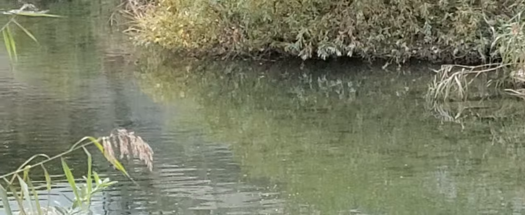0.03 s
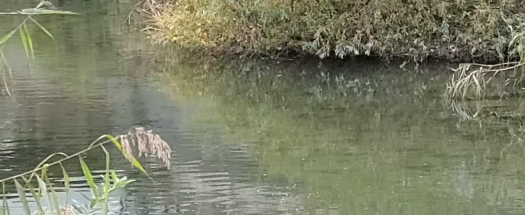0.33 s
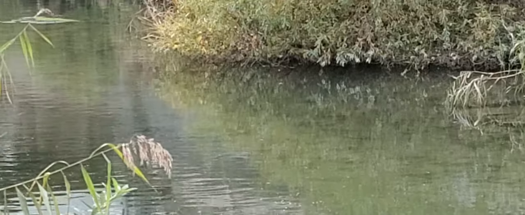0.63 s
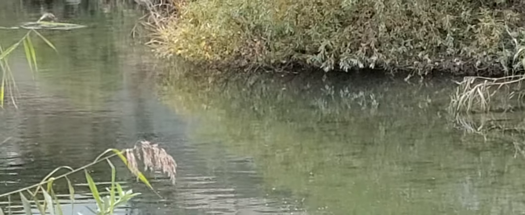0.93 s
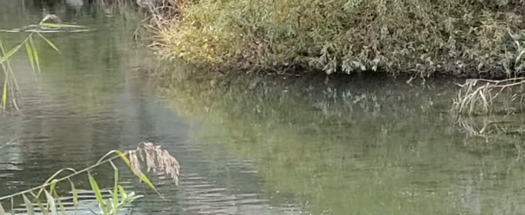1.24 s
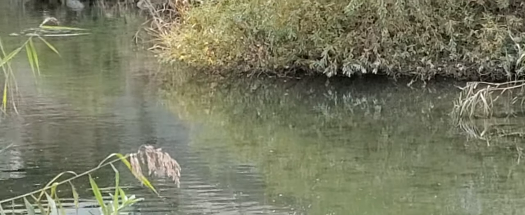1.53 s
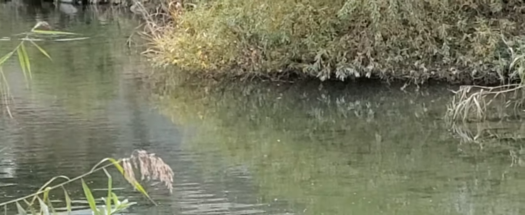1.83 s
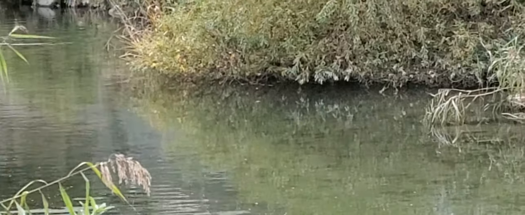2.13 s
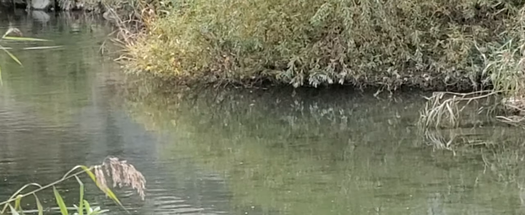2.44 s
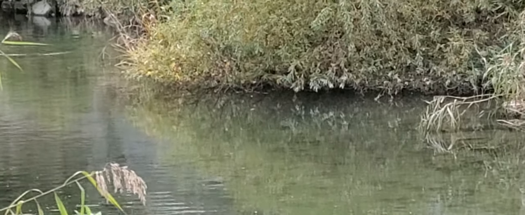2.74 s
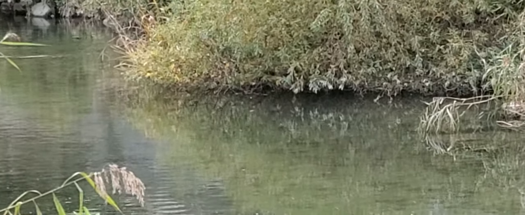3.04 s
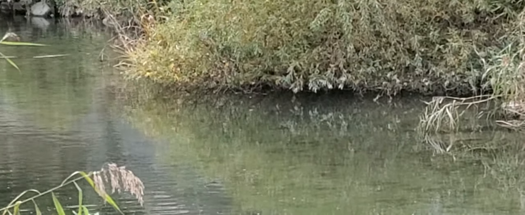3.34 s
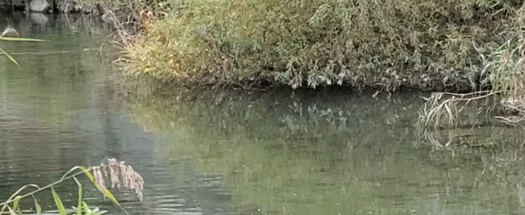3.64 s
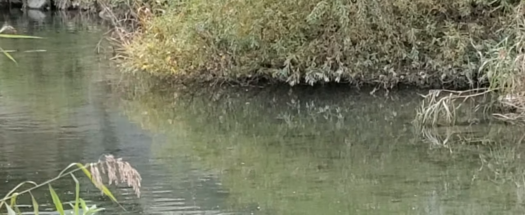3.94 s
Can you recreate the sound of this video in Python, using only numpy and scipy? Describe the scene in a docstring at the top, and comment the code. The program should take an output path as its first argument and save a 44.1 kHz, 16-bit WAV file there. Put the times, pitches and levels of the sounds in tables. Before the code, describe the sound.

Distant traffic makes a steady roar and deep boom over a quiet pond, growing louder after about a second. Small birds chirp faintly across the water, while dry reeds tick very softly to the right of the microphone.

```python
"""The roar and deep boom of distant traffic hang over a quiet pond. The roar is steady tyre noise
that comes up about 6 dB after a second as the recorder's gain rises; the boom is far engines.
Small birds whistle gliding chirps in the bushes across the water, over a fine hiss of leaves.
Dry reeds tick and rustle nearer by, to the right; birds and reeds echo off the banks.
Two microphones a little apart hear the bass alike and the treble unrelated."""
import sys
import numpy as np
from scipy import signal
from scipy.fft import rfft, irfft
from scipy.io import wavfile
from scipy.ndimage import uniform_filter1d

SR = 44100
rng = np.random.default_rng(int(sys.argv[2]) if len(sys.argv) > 2 else 0)


def file_out(sig):
    """Save sig as 16-bit WAV at sys.argv[1]."""
    # one column per channel
    cols = np.atleast_2d(sig).T
    # limit, then scale
    lim = np.clip(cols, -1, 1)
    pcm = np.round(lim * 32767).astype(np.int16)
    wavfile.write(sys.argv[1], SR, pcm)


N = 176400
TIME = np.arange(N) / SR


def amp(db):
    """Decibels to gain."""
    return 10 ** (np.asarray(db) / 20)


def unit(x):
    """Scales to rms 1."""
    return x / np.sqrt(np.mean(abs(x) ** 2) + 1e-30)


def at_hz(points, hz):
    """Reads a curve over log frequency."""
    f, value = np.transpose(points)
    return np.interp(np.log(hz + 1), np.log(f + 1), value)


def fader(points):
    """Gain over time from a curve in dB."""
    return amp(np.interp(TIME, *np.transpose(points)))


def pan(db):
    """Stereo gains for left minus right in dB: negative sits to the right."""
    return unit(amp(np.array([[db / 2], [-db / 2]])))


def add(mix, start_s, sound):
    """Drops a sound into the mix."""
    part = mix[:, max(round(start_s * SR), 0):][:, :sound.shape[-1]]
    part += sound[..., :part.shape[1]]


def band(x, hz, width_hz):
    """Bell-shaped band filter; the width is one standard deviation."""
    f = np.fft.rfftfreq(len(x), 1 / SR)
    return irfft(rfft(x) * np.exp(-.5 * ((f - hz) / width_hz) ** 2), len(x))


def drift(rate_hz):
    """Slow random wander of rms 1."""
    return unit(band(rng.standard_normal(N), 0, rate_hz))


def tone(hz):
    """A sine that follows a pitch curve."""
    return np.sin(2 * np.pi * np.cumsum(hz) / SR)


def bank_echo(dry, wet_db, t60_s=0.26, build_s=0.0064):
    """Adds the scattered echo of bushes and banks."""
    t = np.arange(SR // 2) / SR
    tail = rng.standard_normal((2, len(t))) * 10 ** (-3 * t / t60_s)
    tail *= np.minimum(t / build_s, 1)
    tail /= np.linalg.norm(tail, axis=1, keepdims=True)
    return dry + amp(wet_db) * signal.fftconvolve(dry, tail, axes=1)[:, :N]


# Left-right likeness of the beds, in phase: f/Hz, correlation
IN_PHASE = [(60, 0.72), (87, 1), (130, 0.86), (180, 0.91), (260, 0.95), (380, 0.52), (550, 0.48),
            (790, -0.085), (1140, -0.2), (1650, -0.4), (2380, -0.12), (3440, -0.11), (4970, 0.055),
            (7180, -0.052), (10400, -0.065), (15000, 0.02)]
# Their likeness a quarter cycle apart: f/Hz, correlation
QUADRATURE = [(50, -0.25), (130, -0.26), (600, -0.11), (1050, 0.61), (1900, 0.036), (2700, -0.0011),
              (3600, -0.37), (6000, -0.12)]
# Their stereo balance: f/Hz, left minus right/dB
BED_BALANCE = [(60, -2.5), (99, 1), (160, -3.5), (270, -2), (450, -1.5), (740, -3), (1220, -4.5),
               (2010, -1), (3330, -2.5), (5500, 0), (9080, -1), (15000, -9.5)]


def noise_bed(spectrum, patchy_db, flutter_db):
    """Noise from all around at two microphones, with drifting patches from the moving air."""
    hz, frames = np.fft.rfftfreq(2048, 1 / SR), N // 512 + 5
    left_re, left_im, other_re, other_im, patches = rng.standard_normal((5, frames, len(hz)))
    patches = uniform_filter1d(patches, size=9, axis=0)  # smooth in time
    patches = unit(uniform_filter1d(patches, size=14, axis=1))  # and in frequency
    likeness = at_hz(IN_PHASE, hz) - 1j * at_hz(QUADRATURE, hz)
    likeness /= np.maximum(abs(likeness) / .995, 1)
    left = left_re + 1j * left_im
    right = likeness * left + np.sqrt(1 - abs(likeness) ** 2) * (other_re + 1j * other_im)
    lean_db = at_hz(BED_BALANCE, hz) / 2
    colour = amp(at_hz(spectrum, hz) + patchy_db * patches)
    spectra = np.array([left * amp(lean_db), right * amp(-lean_db)]) * colour
    _, bed = signal.istft(spectra, nperseg=2048, noverlap=1536, time_axis=1, freq_axis=2)
    return unit(bed[:, :N]) * amp(flutter_db * drift(rate_hz=14))


# Colour of the far birdsong: f/Hz, relative level/dB
HAZE_SPECTRUM = [(2500, -32), (3300, -5), (4200, -2), (5200, 4), (5700, -17), (7000, -31)]


def song_haze():
    """Far birdsong, merged by echo into a faint wash."""
    return amp(-76) * noise_bed(HAZE_SPECTRUM, patchy_db=3.5, flutter_db=0.5)


# Colour of the leaf hiss: f/Hz, relative level/dB
LEAF_SPECTRUM = [(3000, -44), (5500, 0), (7000, 0.5), (8700, -3), (10500, -15), (15000, -25)]
# Its rise and fall: t/s, level/dB
LEAF_FADER = [(0.1, -73.5), (0.5, -81.5), (1.0, -76), (1.25, -75), (1.8, -76), (2.2, -77), (2.7, -79),
              (3.05, -87), (3.4, -77), (3.8, -91)]


def leaves():
    """Fine hiss of foliage."""
    return noise_bed(LEAF_SPECTRUM, patchy_db=1.5, flutter_db=.5) * fader(LEAF_FADER)


def whistle(length_s, first_hz, middle_hz, last_hz, waver=0.0318, rough=0.39):
    """One gliding bird note that swells and fades, unsteady in pitch and loudness."""
    progress = np.linspace(0, 1, int(length_s * SR))
    knots = np.linspace(0, 1, 24)
    bend, flicker = (np.interp(progress, knots, row) for row in rng.standard_normal((2, 24)))
    glide = np.polyfit([0, .5, 1], [first_hz, middle_hz, last_hz], 2)
    hz = np.polyval(glide, progress) * (1 + waver * bend)
    envelope = np.interp(progress, [0, 0.31, 1], [0, 1, 0])
    return envelope * unit((1 + rough * flicker) * tone(hz))


def far_flock(calls=36, low_hz=3220, high_hz=5440, fall=0.096):
    """Faint twitter of birds farther off: falling notes at random, mostly echo."""
    twitter = np.zeros((2, N))
    for slot, (when, pitch, loud) in enumerate(rng.random((calls, 3))):
        hz = low_hz + pitch * (high_hz - low_hz)
        note = whistle(.04, hz * (1 + fall), hz, hz * (1 - fall))
        add(twitter, (slot + when) / calls * N / SR, amp(-82.25 + 5 * loud) * note)
    return bank_echo(twitter, wet_db=2)


# Ticks of dry reeds: t/s, level/dB, centre f/Hz, left minus right/dB
REED_TICKS = [(0.1456, -67, 8800, -1), (0.2894, -71, 9500, -7), (0.8659, -72, 10000, -8),
              (1.0969, -66, 10300, -16), (1.2047, -62, 9550, -16), (1.3558, -67, 10200, -18),
              (1.4994, -70, 9800, -10), (2.5244, -73, 10200, -5), (2.708, -71, 9000, -5),
              (3.3368, -73, 11800, -9), (3.3657, -74, 11000, -9)]
# Rustles of reed leaves: t/s, length/s, level/dB
REED_RUSTLES = [(2.56, .09, -83), (3.155, 0.071, -78), (3.385, .04, -80)]


def reeds(tick_peak_s=0.00085, grains_per_s=900):
    """Single dry snaps, and clumps of tiny ones where leaves brush."""
    mix, t = np.zeros((2, N)), np.arange(1024) / SR
    snap_envelope = t / tick_peak_s * np.exp(1 - t / tick_peak_s)
    for start_s, db, hz, pan_db in REED_TICKS:
        snap = unit(band(rng.standard_normal(len(t)), hz, width_hz=1800))
        add(mix, start_s, pan(pan_db) * amp(db) * snap * snap_envelope)
    for start_s, length_s, db in REED_RUSTLES:
        samples = int(length_s * SR)
        grains = rng.standard_normal(SR) * (rng.random(SR) < grains_per_s / SR)
        rustle = unit(band(grains[:samples], hz=12200, width_hz=2400))
        add(mix, start_s, pan(-15) * amp(db) * np.sqrt(np.hanning(samples)) * rustle)
    return bank_echo(mix, wet_db=-3)


# Chirps across the water: t/s, length/s, first f/Hz, middle f/Hz, last f/Hz, level/dB
BIRD_CHIRPS = [(0.205, .05, 5700, 5200, 4200, -73), (0.408, .04, 4600, 4600, 4400, -72),
               (0.924, .04, 5500, 4100, 3400, -70), (1.145, .052, 5700, 3850, 3120, -58.5),
               (1.698, 0.043, 4200, 3400, 3050, -64), (1.776, 0.036, 3500, 3380, 3080, -64),
               (1.858, 0.053, 4600, 4390, 4300, -67), (2.339, 0.052, 4400, 4000, 3200, -60),
               (2.37, .04, 5300, 4300, 3180, -69), (2.409, 0.042, 4200, 3770, 3260, -60),
               (2.547, 0.029, 4300, 4200, 4000, -69), (2.64, .065, 4300, 5750, 5730, -71),
               (2.695, 0.034, 5820, 5000, 3840, -63), (2.735, .03, 6000, 5230, 4300, -75),
               (3.184, .07, 5900, 6450, 6000, -72), (3.225, 0.022, 3400, 3350, 3200, -64),
               (3.255, .025, 3980, 4200, 4300, -65), (3.434, .07, 5700, 5520, 5300, -72),
               (3.508, 0.048, 5500, 5240, 4750, -69), (3.60, .05, 5700, 5950, 5600, -75),
               (3.676, 0.033, 4600, 4410, 4440, -62.5), (3.685, 0.039, 3900, 3630, 3670, -58),
               (3.835, .03, 4700, 4100, 3470, -64), (3.893, 0.0263, 4300, 4200, 4100, -58),
               (3.917, 0.028, 3760, 3600, 3500, -58.5), (3.89, .06, 5200, 5370, 5500, -74),
               (3.971, 0.05, 4200, 4500, 4380, -58.5)]
# Thin high pips: t/s, level/dB
BIRD_PIPS = [(1.357, -71), (2.114, -76), (2.58, -76), (3.146, -64), (3.893, -70)]


def birds(pip_s=0.015, pip_hz=11100):
    """Distant chirps blurred by the banks, and nearer thin pips far to the right."""
    far, near = np.zeros((2, 2, N))
    for start_s, length_s, *glide_hz, db in BIRD_CHIRPS:
        add(far, start_s, pan(-9.5) * amp(db) * whistle(length_s, *glide_hz))
    for start_s, db in BIRD_PIPS:
        add(near, start_s, pan(-23) * amp(db) * whistle(pip_s, pip_hz, pip_hz, pip_hz, waver=.02))
    return bank_echo(far, wet_db=-1) + bank_echo(near, wet_db=-4)


# Brief midrange swells in the roar: peak t/s, half-length/s, centre f/Hz, width/Hz, level/dB
MID_SWELLS = [(2.132, 0.035, 373, 130, -45), (2.87, .05, 398, 110, -49), (2.92, .1, 780, 60, -51)]


def mid_swells(spectrum):
    """Narrow bands of the roar briefly grow fuller."""
    bed, mix = noise_bed(spectrum, patchy_db=2, flutter_db=.4), np.zeros((2, N))
    for peak_s, half_s, hz, width_hz, db in MID_SWELLS:
        envelope = np.exp(-((TIME - peak_s) / half_s) ** 2)
        mix += amp(db) * envelope * unit(np.array([band(side, hz, width_hz) for side in bed]))
    return mix


# Resonances of the boom: f/Hz, full width/Hz, relative level/dB
BOOM_RESONANCES = [(56.5, 23.4, -2.5), (77.2, 18.4, -7.5)]
# Heave of the boom and drone: t/s, level/dB
BOOM_FADER = [(0.1, -42), (0.27, -49), (0.38, -40), (0.51, -51), (0.61, -38.5), (0.73, -46.5), (0.9, -42),
              (1.15, -42.5), (1.3, -36), (1.52, -40), (1.68, -34.5), (1.97, -37.5), (2.28, -34.5),
              (2.7, -35), (3.0, -38.5), (3.14, -31), (3.35, -37), (3.7, -40), (4, -33.5)]


def engines(drone_hz=58.36, surge_hz=79.5, surge_at_s=1.806, surge_half_s=0.13):
    """The boom and wavering drone of far engines, with one brief higher surge."""
    boom = sum(amp(db) * unit(band(rng.standard_normal(N), hz, full_width / 2))
               for hz, full_width, db in BOOM_RESONANCES)
    waver_hz = 1.516 * drift(rate_hz=2.65)
    drone = amp(-5.5) * unit(tone(drone_hz + waver_hz))
    surge_envelope = np.exp(-((TIME - surge_at_s) / surge_half_s) ** 2)
    surge = amp(-34.5) * unit(tone(surge_hz + waver_hz)) * surge_envelope
    return pan(-2.5) * ((boom + drone) * fader(BOOM_FADER) + surge)


# Colour of the tyre roar: f/Hz, relative level/dB
ROAR_SPECTRUM = [(12, -31), (21, -1), (29, -2), (45, -2.5), (100, 6), (140, -5.5), (190, -3), (232, -1.5),
                 (310, -6.5), (480, -9), (760, -9.5), (1100, -13.5), (1400, -18.5), (1750, -19),
                 (2350, -28), (3000, -28.5), (4000, -35), (5200, -41), (5900, -46), (8500, -50.5),
                 (10200, -55), (11300, -55.5), (12000, -57.5), (15500, -58)]
# The recorder's gain ramp, applied to the roar: t/s, gain/dB
RECORDER_GAIN = [(0.1, -5), (0.7, -5.5), (1.05, -5), (1.25, -2.5), (1.55, -0.5), (1.8, 1.1), (2.0, -0.5),
                 (2.15, -0.3), (2.5, -0.1), (2.92, 0.44), (3.05, -0.85), (3.4, -0.24), (4, -0.04)]


def traffic():
    """Steady tyre roar that comes up about 6 dB as the recorder's gain rises; engines underneath."""
    tyres = amp(-38) * noise_bed(ROAR_SPECTRUM, patchy_db=1.06, flutter_db=0.02)
    return tyres * fader(RECORDER_GAIN) + engines() + mid_swells(ROAR_SPECTRUM)


def scene():
    """Everything heard at the water's edge."""
    return song_haze() + traffic() + leaves() + birds() + far_flock() + reeds()


def record(dry, start_s=.068, fade_in_s=.0004, cutoff_hz=15750):
    """The sound starts abruptly; a steep low-pass ends the treble."""
    opened = dry * np.clip((TIME - start_s) / fade_in_s, 0, 1)
    low_pass = signal.firwin(511, cutoff_hz, window=("kaiser", 9), fs=SR)
    return signal.oaconvolve(opened, low_pass[None], "same")


dry = scene()
out = record(dry)
file_out(out)
```